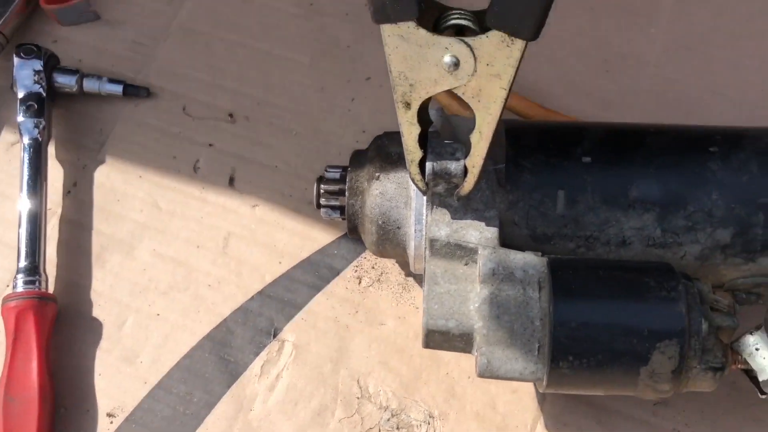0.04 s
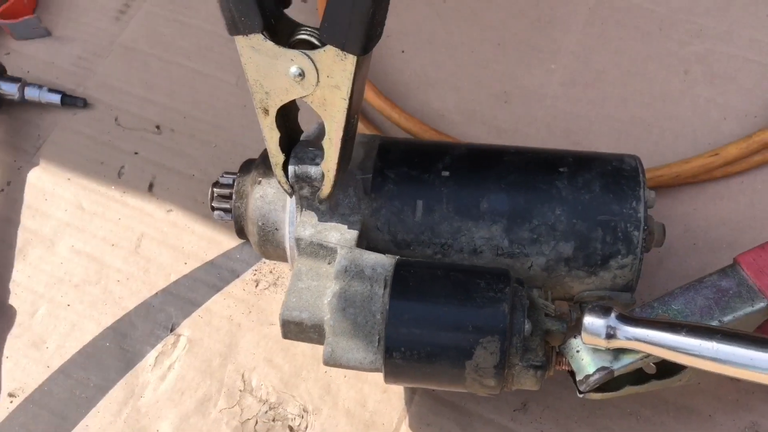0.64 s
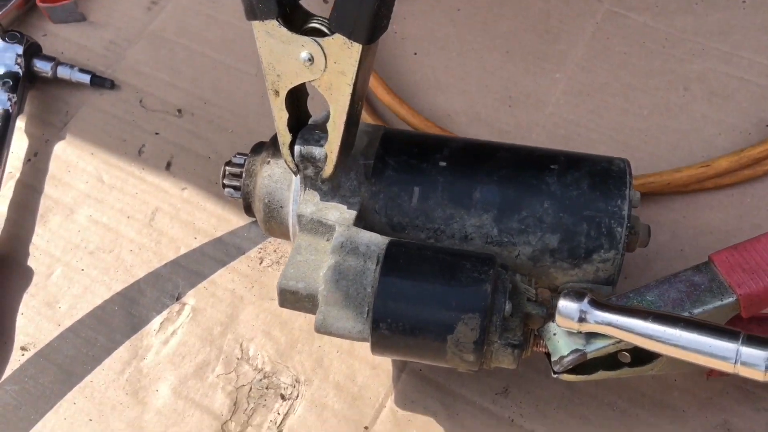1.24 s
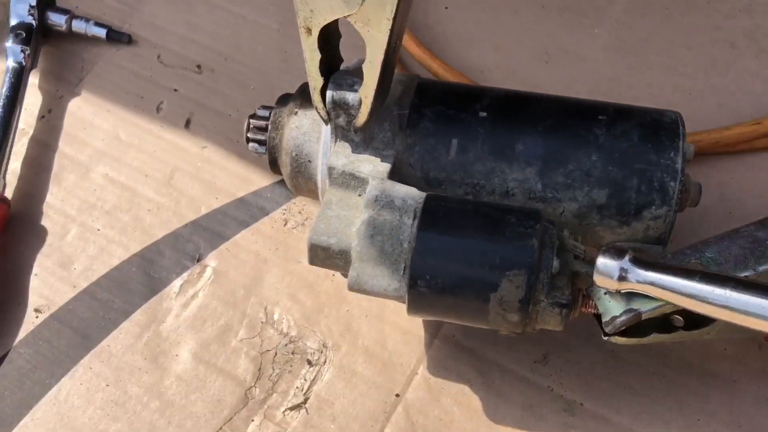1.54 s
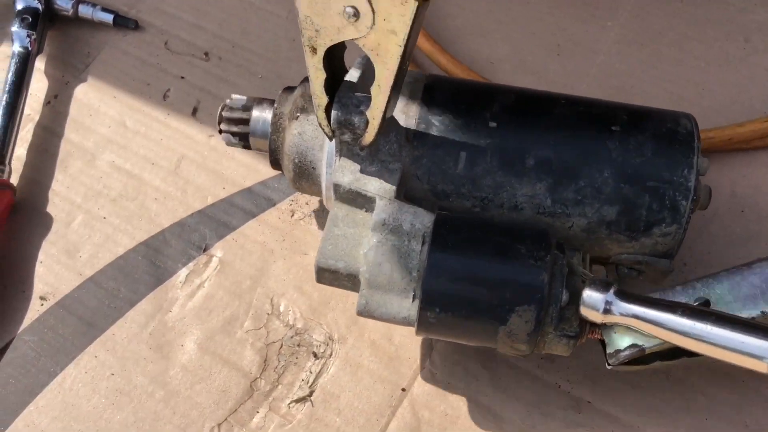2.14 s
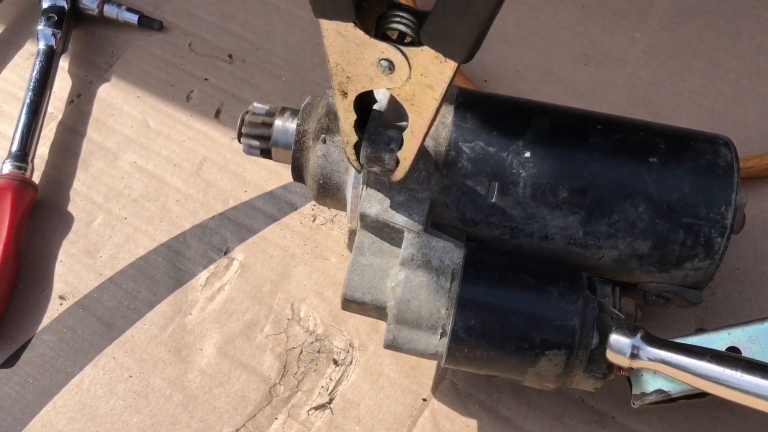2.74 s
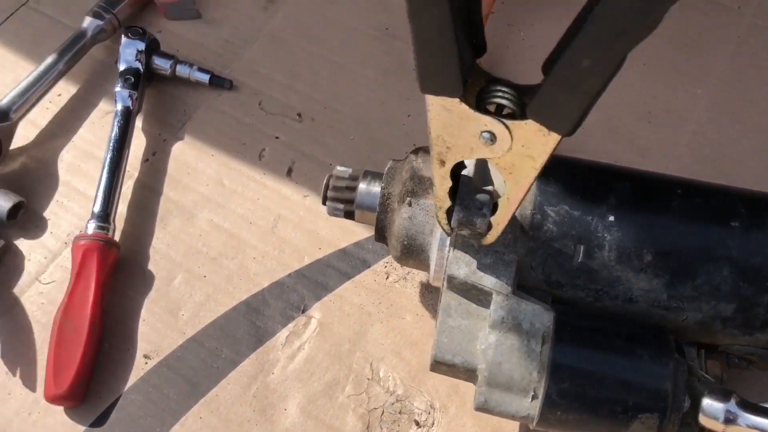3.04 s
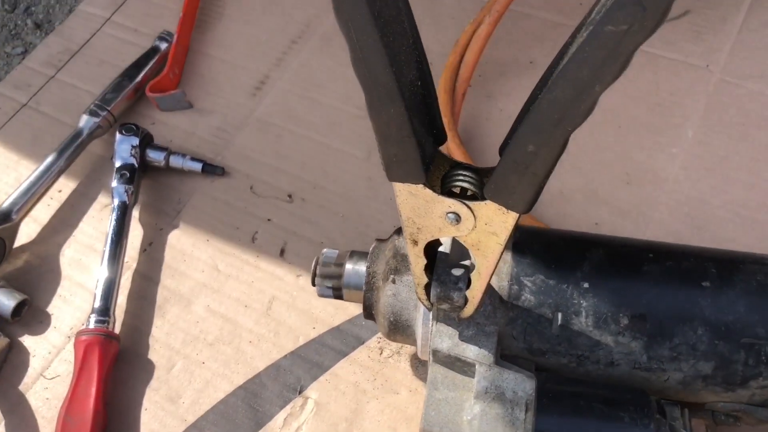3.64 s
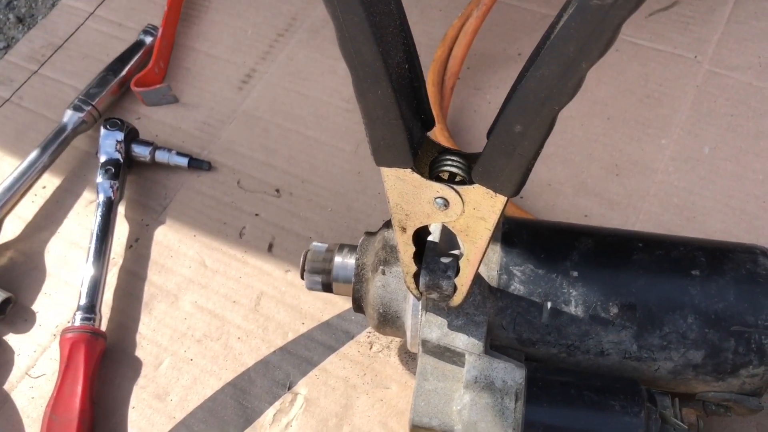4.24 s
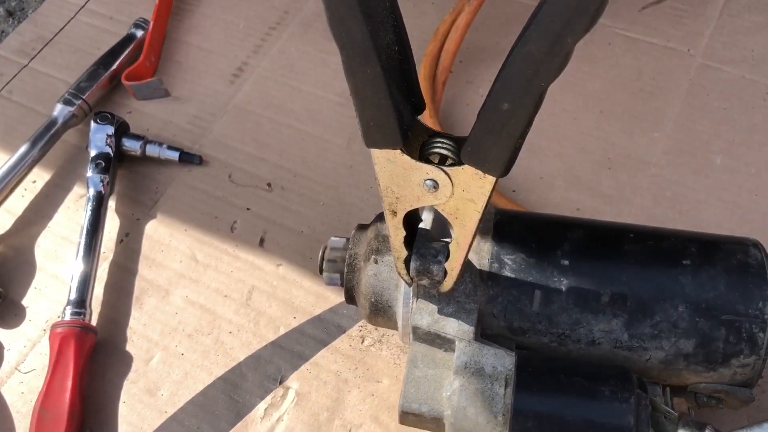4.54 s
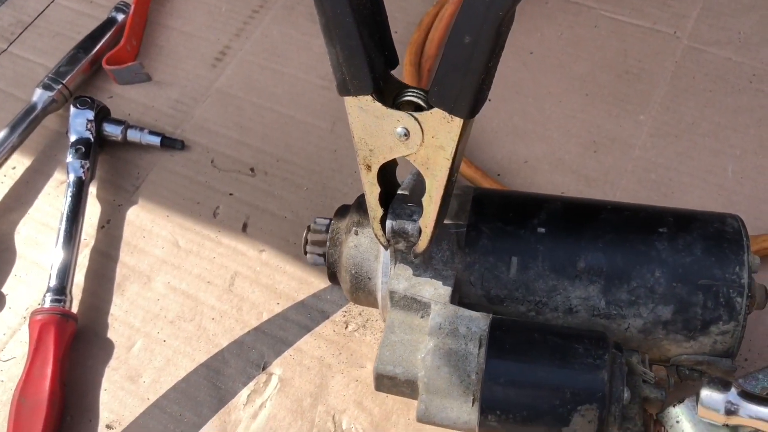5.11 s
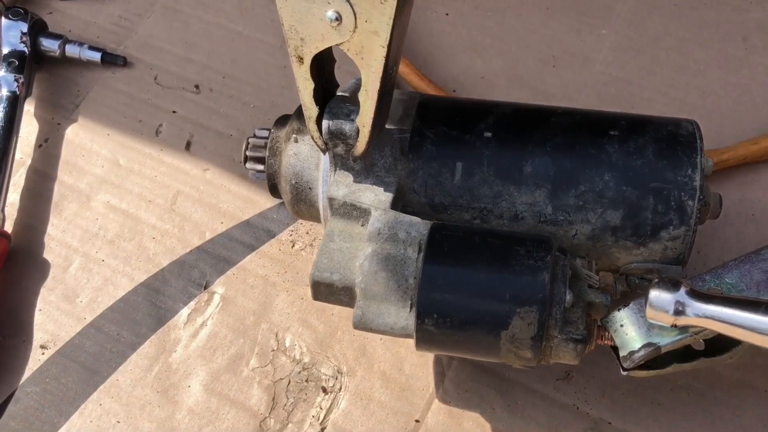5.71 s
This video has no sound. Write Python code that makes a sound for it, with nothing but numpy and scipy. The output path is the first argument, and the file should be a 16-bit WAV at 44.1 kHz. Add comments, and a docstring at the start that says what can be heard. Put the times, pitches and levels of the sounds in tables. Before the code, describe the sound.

Close up in quiet open air, a wrench taps lightly on metal after a few faint, far bird notes. Sparks crackle and gears grind in short jerks as jump leads feed a starter motor lying on cardboard. It runs for a couple of seconds with a loud, rasping, high squeal and whine, clacking and thumping now and then, before gradually slowing with a dry scrape and loose metallic knocks.

```python
"""Outdoors a far bird calls, and a socket wrench ticks on the terminal of a bare starter motor on cardboard.
From 1.85 s the wrench bridges it to jump leads: the contact sparks, the solenoid chatters, the gears jerk.
At 2.1 s the contact holds; the motor spins up and a dry bearing squeals over brushes, gears and clacks.
At 4.6 s the contact opens, the squeal dies and the armature coasts down, rattling."""
import sys
import numpy as np
from scipy import signal
from scipy.fft import rfft, irfft, next_fast_len
from scipy.io import wavfile

SR = 44100
rng = np.random.default_rng(int(sys.argv[2]) if len(sys.argv) > 2 else 0)


def wav_out(sig):
    """Save sig, one row per channel (or a flat mono array), as 16-bit PCM at SR to the path in sys.argv[1]."""
    wavfile.write(sys.argv[1], SR, np.round(np.clip(np.atleast_2d(sig).T, -1, 1) * 32767).astype(np.int16))


N = 263277
T = np.arange(N) / SR
FFT_LEN = next_fast_len(N + 8192, True)
HZ = np.fft.rfftfreq(FFT_LEN, 1 / SR)
ON_S, OFF_S = 2.125, 4.6  # contact holds, opens
SINCE_ON_S, SINCE_OFF_S = (T - ON_S).clip(0), (T - OFF_S).clip(0)


def amp(db):
    """Decibels to gain."""
    return 10 ** (np.asarray(db) / 20)


def unit(x):
    """Scales to rms 1."""
    return x / np.sqrt(np.mean(abs(x) ** 2) + 1e-20)


def noise():
    """White noise."""
    return rng.standard_normal(N)


def wander(hz):
    """Smooth random drift up to about hz, rms 1."""
    pole = np.exp(-2 * np.pi * hz / SR)
    return unit(signal.lfilter([1], [1, -2 * pole, pole * pole], noise()))


def after(s, fade_s):
    """Ramp from 0 to 1 around time s."""
    return np.clip((T - s) / fade_s + .5, 0, 1)


def swell(s, half_s):
    """Bell envelope around time s."""
    return np.exp(-((T - s) / half_s) ** 2)


def burst(s, rise_s, decay_s):
    """Envelope of one blow."""
    age = np.maximum(T - s, 0)
    return np.minimum(age / rise_s, 1) * np.exp(-np.maximum(age - rise_s, 0) / decay_s)


def filtered(x, response):
    """Applies a frequency response, padded for its ring."""
    return irfft(rfft(x, FFT_LEN) * response, FFT_LEN)[:N]


def colour(x, spectrum):
    """Filters by (Hz, dB) points, keeping the power of white noise."""
    hz, db = np.transpose(spectrum)
    return filtered(x, unit(amp(np.interp(np.log(HZ + 1), np.log(hz), db))))


def mode(hz, width):
    """One resonance, 1 at its centre."""
    return 1j * HZ * width / (hz ** 2 - HZ ** 2 + 1j * HZ * width)


def ringing(x, modes):
    """Metal rings in its modes, keeping the power of white noise."""
    response = sum((-1) ** k * amp(db) * mode(hz, width) for k, (hz, width, db) in enumerate(modes))
    return filtered(x, unit(response))


# outdoor air: (frequency [Hz], density [dB])
AIR_SPECTRUM = [(25, -18), (50, -8), (110, -3), (200, 0), (330, -3), (500, -2), (750, -8), (1600, -14),
                (4000, -18), (6500, -20), (10000, -27), (15700, -32)]
def air():
    """Quiet, slightly wavering rush."""
    return amp(-63.5 + .7 * wander(8)) * colour(noise(), AIR_SPECTRUM)


# notes: (start [s], length [s], from [Hz], to [Hz], level [dB])
BIRD_NOTES = [(.03, .1, 8000, 7000, -80), (0.245, 0.069, 6500, 6200, -63), (0.405, .085, 6800, 5950, -66)]
def bird():
    """A far bird whistles falling notes."""
    out = 0
    for s, length_s, from_hz, to_hz, db in BIRD_NOTES:
        progress = np.clip((T - s) / length_s, 0, 1)
        pitch_hz = (from_hz + (to_hz - from_hz) * progress) * (1 + .012 * wander(150))
        out += amp(db) * np.sin(np.pi * progress) * np.sin(2 * np.pi * np.cumsum(pitch_hz) / SR)
    return out


# casting modes: (frequency [Hz], width [Hz], gain [dB])
HOUSING_MODES = [(142.3, 18, -9.5), (208, 32, -7.5), (635, 69, -6.5), (806, 90, -5), (1122, 152, -4),
                 (1360, 205, 2), (1558, 340, -2), (1913, 185, -3.5), (2375, 63, -3.5)]
def housing(x):
    """The cast housing rings when knocked."""
    return ringing(x, HOUSING_MODES)


# taps: (time [s], level [dB], knock offset [dB])
WRENCH_TICKS = [(0.5384, -56, -15), (1.01, -60, -15), (1.0301, -62, -14), (1.2432, -55.5, 0),
                (1.266, -54, -14), (1.3386, -54, 5), (1.3884, -62, -12), (1.481, -54, -26),
                (1.7506, -49.5, -24)]
# pushes: (centre [s], half length [s], level [dB])
WRENCH_SLIDES = [(1.35, .035, -67), (1.84, 0.055, -63)]
# steel on the stud: (frequency [Hz], density [dB])
TICK_SPECTRUM = [(300, -16), (1500, -6), (3000, 0), (6000, 1), (8500, -6), (15700, -17)]
def wrench():
    """The wrench feels for the terminal: ticks, low knocks, short slides."""
    tick = sum(amp(db) * burst(s, .0007, .003) for s, db, _ in WRENCH_TICKS)
    knock = sum(amp(db + knock_db) * burst(s, .00076, .006) for s, db, knock_db in WRENCH_TICKS)
    slide = sum(amp(db) * swell(s, half_s) for s, half_s, db in WRENCH_SLIDES) * amp(3.9 * wander(60))
    return colour(noise(), TICK_SPECTRUM) * (tick + slide) + amp(2.5) * knock * housing(noise())


# arcs: (time [s], relative level [dB], solenoid knock offset [dB])
SPARK_EVENTS = [(1.852, -28, -12), (1.859, -23, 14), (1.8636, -15, -6), (1.872, -13, 9), (1.8777, -3, -21),
                (1.9155, -7.5, 7), (1.948, -4, -21), (1.968, -11, 1), (1.9765, -27, -4), (1.9926, -16, 16),
                (2.025, -21, -5), (2.027, -6, -15), (2.0355, -4.5, -22), (2.083, -7, -4), (2.0945, -5, -23)]
# sharp crack: (frequency [Hz], density [dB])
CRACK_SPECTRUM = [(300, -50), (2000, -2), (4000, 3), (7000, 1.5), (11000, 2), (15700, -4.5)]
def sparks():
    """The contact spits; each time the solenoid slams the housing."""
    spit = sum(amp(db) * burst(s, .0011, .0026) for s, db, _ in SPARK_EVENTS)
    slam = sum(amp(db + knock_db) * burst(s, .0012, .0027) for s, db, knock_db in SPARK_EVENTS)
    return amp(-3.5) * spit * colour(noise(), CRACK_SPECTRUM) + amp(-10.5) * slam * housing(noise())


# brief contacts: (start [s], length [s], relative level [dB])
CONTACT_CATCHES = [(1.86, 0.015, -27.5), (1.89, 0.013, -19.5), (1.91, 0.033, -25), (1.956, 0.041, -19.5),
                   (2.02, 0.015, -27), (2.049, 0.045, -24.5), (2.106, 0.029, -24.5)]
# jerking gears: (frequency [Hz], density [dB])
GRIND_SPECTRUM = [(24, -49), (40, -7), (229, 0.5), (562, -5), (722, 4), (1050, -2), (1350, 2.5),
                  (1520, 1.5), (3650, -5.5), (4130, -9.5), (9890, -9), (15500, -14.5)]
def gear_grind(attack_s=.0036, release_s=.005):
    """The gears grind whenever the contact catches and churn faintly in between."""
    envelope = amp(-35) * after(CONTACT_CATCHES[0][0], .01) * (1 - after(ON_S, .022))
    for s, length_s, db in CONTACT_CATCHES:
        catch = np.clip((T - s) / attack_s, 0, 1) * np.exp(-(T - s - length_s).clip(0) / release_s)
        envelope = np.maximum(envelope, amp(db) * catch)
    grain = unit(noise() * amp(3.1 * wander(340)))
    return amp(3.5) * envelope * colour(grain, GRIND_SPECTRUM)


CONTACT_RPS, FREE_RPS = 79, 248
def armature_rps(spin_up_s=.305, drag_per_s=.3, friction_rps_per_s=91.5):
    """Turns a second: nears free speed under power, then drag and dry friction slow it."""
    driven = FREE_RPS - (FREE_RPS - CONTACT_RPS) * np.exp(-SINCE_ON_S / spin_up_s)
    kept = np.exp(-drag_per_s * SINCE_OFF_S)
    return driven * kept - friction_rps_per_s / drag_per_s * (1 - kept)


# squeal centre: (time [s], pitch [Hz])
SQUEAL_GLIDE = [(2.12, 1500), (2.165, 2270), (2.2, 2190), (2.33, 2360), (2.6, 2440), (4.5, 2560),
                (4.8, 2400)]
# beating shaft wobbles: (rate [Hz], nominal depth [Hz], crest time [s])
SHAFT_SWAYS = [(13.25, 98, 3.326), (8.895, 78, 3.312), (4.39, 32, 3.292)]
def squeal_hz(build_s=.35, stop_s=.04, drift_hz=28):
    """The pitch sways unevenly with a shaft wobble that builds under power and stops without it."""
    centre = np.interp(T, *np.transpose(SQUEAL_GLIDE))
    sway = sum(depth * np.cos(2 * np.pi * rate * (T - crest)) for rate, depth, crest in SHAFT_SWAYS)
    reach = (1 - np.exp(-SINCE_ON_S / build_s)) * np.exp(-SINCE_OFF_S / stop_s)
    uneven = 1 + .22 * wander(6)
    return (centre + reach * uneven * sway + drift_hz * wander(20)) * (1 + .013 * wander(150))


# harmonics: (multiple, relative tone level [dB], relative skirt level [dB])
SQUEAL_HARMONICS = [(1, -12, -12.5), (2, -12, -8.5), (3, -11, -13), (4, -13, -10.5), (5, -12, -11),
                    (6, -8, -9.5)]
def bearing_squeal(build_s=.0041):
    """The dry bearing sticks and slips: wavering harmonics, each with a rasping skirt."""
    pitch_hz = squeal_hz()
    phase = 2 * np.pi * np.cumsum(pitch_hz) / SR
    # a second rubbing spot slips out of step
    stray_phase = 2 * np.pi * np.cumsum(pitch_hz * (1 + .028 * wander(22))) / SR
    clean = amp(2 - .83 * SINCE_ON_S)  # grows hoarser
    out = 0
    for k, tone_db, skirt_db in SQUEAL_HARMONICS:
        width_hz = 170 + 85 * k
        skirt = amp(skirt_db) * unit(wander(width_hz) + 1j * wander(width_hz))
        line = ((amp(tone_db) * clean + skirt) * np.exp(1j * k * phase)).real
        stray = amp(tone_db - 8.5 + k) * np.cos(k * stray_phase)
        waver = unit(amp(1.02 * wander(23)))
        build = 1 - np.exp(-SINCE_ON_S / (k * build_s))
        out += build * waver * (line + stray)
    return np.sqrt(2) * out


# driven brushes: (frequency [Hz], density [dB])
BRUSH_SPECTRUM = [(50, -53), (75, -4), (110, -24), (160, -9), (300, -4), (1000, 1), (2200, 4), (3500, -2),
                  (5700, 2.5), (8500, 3), (11000, -0.5), (13300, 4.5), (15700, -0.5)]
def brush_hiss():
    """Brushes rub the commutator under power."""
    return amp(-1.5) * colour(noise(), BRUSH_SPECTRUM)


def gear_rattle(rps, knocks_per_turn=4, spread_db=4.24):
    """Loose teeth knock the housing at random, less often at low speed."""
    clicks = (rng.random(N) < knocks_per_turn * rps / SR) * rng.choice([-1, 1], N)
    sizes = amp(spread_db * np.clip(noise(), -2, 2))
    knocks = unit(clicks * sizes / np.sqrt(rps))
    return amp(-1) * housing(knocks + .42 * noise()) + amp(-7.5) * colour(knocks, SCRAPE_SPECTRUM)


# body resonances for the bar tone: (frequency [Hz], width [Hz], level re gears [dB])
BAR_PEAKS = [(1850, 550, -2), (2570, 360, 0), (3500, 870, -7.5), (4300, 430, -4)]
# for its octave: (frequency [Hz], width [Hz], level re gears [dB])
BAR_OCTAVE_PEAKS = [(2670, 320, 3), (3030, 470, -4.5), (5050, 180, -9)]
def commutator_whine(rps, bars=23):
    """Bars pass the brushes: a thin tone that swells as it sweeps through resonances."""
    phase = 2 * np.pi * bars * np.cumsum(rps * (1 + .0055 * wander(66))) / SR
    out = 0
    for k, peaks in (1, BAR_PEAKS), (2, BAR_OCTAVE_PEAKS):
        pitch_hz = k * bars * rps
        gains = [amp(db) / (1 + (2 * (pitch_hz - hz) / width) ** 2) for hz, width, db in peaks]
        out += np.linalg.norm(gains, axis=0) * np.sin(k * phase)
    return out * amp(2 * wander(60))


def unbalance_hum(rps, angle, peak_rps=198, half_width_rps=18):
    """The unbalanced armature shakes the body on its cardboard, most near one speed."""
    gain = amp(-31) + amp(-21) / (1 + ((rps - peak_rps) / half_width_rps) ** 2)
    return gain * rps / FREE_RPS * np.sin(angle) * amp(3.5 * wander(25))


# rough moments: (centre [s], half length [s], gear lift [dB], friction lift [dB])
PINION_SURGES = [(2.339, 0.014, 4.5, -0.5), (2.48, 0.0092, 7, 1.5), (3.595, .015, 5, -0.5),
                 (4.235, .035, 2.5, 1), (4.444, .03, 2.5, 2), (4.536, 0.01, 3, -0.5)]
def running_gains(rps, live, driven_db=-14.5, coast_db=-19.5, knee_rps=146):
    """Gear and friction gains grow with speed and surge when the pinion runs rough."""
    gear_db = -23.5 + 4.5 * np.log2(rps / FREE_RPS)
    friction_db = live * driven_db + (1 - live) * coast_db - 10 * np.log10(1 + (knee_rps / rps) ** 3)
    for s, half_s, gear_lift_db, friction_lift_db in PINION_SURGES:
        gear_db += gear_lift_db * swell(s, half_s)
        friction_db += friction_lift_db * swell(s, half_s)
    return amp(gear_db), amp(friction_db)


# blows: (time [s], relative level [dB])
PINION_CLACKS = [(2.528, -17), (3.285, -8), (3.319, -5.5), (3.391, -6), (3.591, -6), (4.233, -17),
                 (4.428, -15), (4.529, -4), (4.547, -4), (4.924, -3.5), (5.013, -11), (5.097, -17),
                 (5.115, -11), (5.262, -18), (5.348, -20), (5.461, -14), (5.487, -18), (5.59, -15),
                 (5.746, -15), (5.78, -12)]
def pinion_clacks():
    """The loose pinion strikes the housing."""
    blows = sum(amp(db) * burst(s, .0018, .0011) for s, db in PINION_CLACKS)
    return blows * (amp(-6.5) * housing(noise()) + amp(-7) * colour(noise(), CRACK_SPECTRUM))


# jolts: (time [s], level [dB])
BODY_JOLTS = [(3.321, -26.5), (3.39, -32), (4.424, -33), (4.55, -27)]
# cardboard: (frequency [Hz], density [dB])
THUMP_SPECTRUM = [(50, -25), (130, -22), (230, 9), (450, -3), (800, -15), (2000, -45)]
def cardboard_thumps():
    """The jolted body thumps the cardboard."""
    jolts = sum(amp(db) * burst(s, .0048, .024) for s, db in BODY_JOLTS)
    return jolts * colour(noise(), THUMP_SPECTRUM)


# unpowered brushes, also gear clicks: (frequency [Hz], density [dB])
SCRAPE_SPECTRUM = [(50, -23), (80, -13), (200, -2), (450, -2), (750, 1.5), (2400, 4.5), (3500, 1),
                   (4800, 1), (6400, 4.5), (7500, 4.5), (8700, -6.5), (9400, -1), (12000, -1.5),
                   (15700, -2.5)]
# shaft in its bushes: (frequency [Hz], width [Hz], gain [dB])
SHAFT_MODES = [(2400, 190, -9), (4780, 170, -6), (5690, 120, -10), (7930, 220, -8), (8720, 380, 1),
               (9070, 140, -3), (9650, 80, -2), (12680, 170, -8)]
def coasting_scrape():
    """The brush hiss fades while the scraping shaft's ring stands out more."""
    hiss = amp(1 - SINCE_OFF_S) * colour(noise(), SCRAPE_SPECTRUM)
    return hiss + amp(-5 + 2.2 * SINCE_OFF_S) * ringing(noise(), SHAFT_MODES)


def motor(linger_s=.25):
    """Friction, gears, whine and hum follow the armature; some squeal briefly outlasts the current."""
    rps = armature_rps()
    angle = 2 * np.pi * np.cumsum(rps) / SR
    live = 1 - after(OFF_S, .1)
    gear_gain, friction_gain = running_gains(rps, live)
    flutter = unit(amp(.52 * np.cos(angle) + 1.13 * wander(230)))
    lingering = .4 * (1 - live) * np.exp(-SINCE_OFF_S / linger_s)
    friction = (live + lingering) * bearing_squeal() + live * brush_hiss()
    friction += (1 - live) * coasting_scrape()
    rotation = gear_rattle(rps) + commutator_whine(rps) + unbalance_hum(rps, angle)
    return after(ON_S, .02) * (friction_gain * flutter * friction + gear_gain * rotation)


def smear(x, t60_s=.14, above_hz=2600):
    """Dense faint steel modes add a short tail to the treble."""
    tail = rfft(noise() * amp(-60 * T / t60_s), FFT_LEN)
    share = amp(-13.5) / (1 + (above_hz / (HZ + 1)) ** 4)
    return filtered(x, (1 + share * unit(tail)) / np.sqrt(1 + share ** 2))


# yoke and shaft rings: (frequency [Hz], width [Hz], lift [dB])
STEEL_MODES = [(1337, 46, 3), (2330, 27, -3), (4940, 90, 2), (5150, 114, 1.5), (5400, 120, 2),
               (5625, 20, 5), (5740, 50, 4.5), (6090, 70, 3.5), (6420, 150, 2), (7300, 200, 1),
               (10240, 50, 2), (12550, 200, 1), (13300, 110, 4), (14400, 300, 1.5)]
def steel_body(x):
    """Vibration leaves through the steel body, which rings at its own pitches."""
    lifts = [1 + (amp(db) - 1) * mode(hz, width) for hz, width, db in STEEL_MODES]
    return amp(-1) * filtered(x, np.prod(lifts, axis=0))


def scene():
    """The starter, close by in open air; mono."""
    starter = smear(motor()) + pinion_clacks() + cardboard_thumps() + gear_grind() + sparks() + wrench()
    return (steel_body(starter) + air() + bird())[None]


def record(dry, low_hz=55.7, high_hz=15780, ceiling=.85):
    """A small microphone drops deep bass and rounds peaks; then a band limit."""
    thin = signal.sosfilt(signal.butter(2, low_hz, "highpass", fs=SR, output="sos"), dry)
    rounded = thin / (1 + (abs(thin) / ceiling) ** 4) ** (1 / 4)
    lowpass = signal.firwin(511, high_hz, window=("kaiser", 9), fs=SR)
    return signal.oaconvolve(rounded, lowpass[None], "same")


dry = scene()
out = record(dry)
wav_out(out)
```